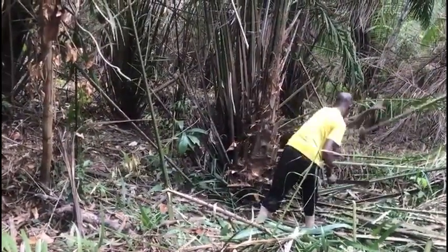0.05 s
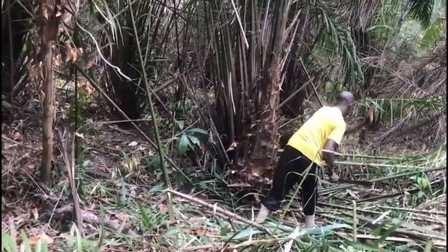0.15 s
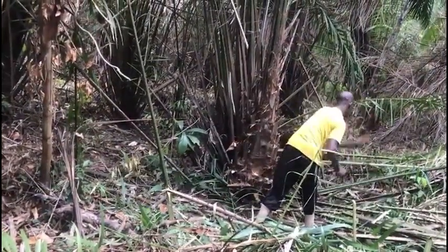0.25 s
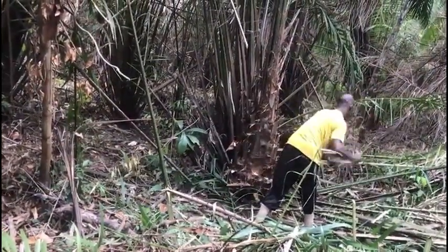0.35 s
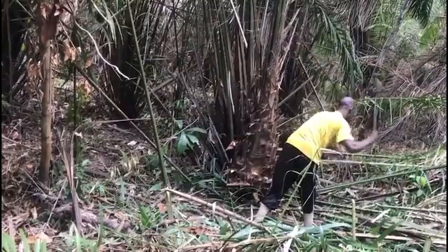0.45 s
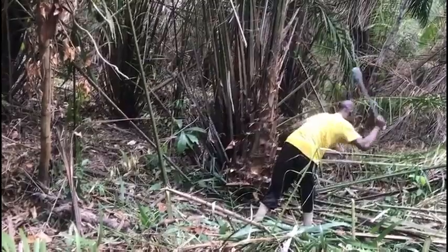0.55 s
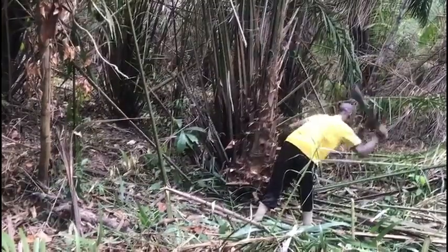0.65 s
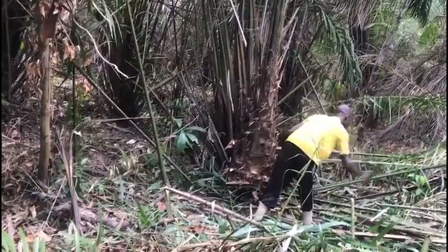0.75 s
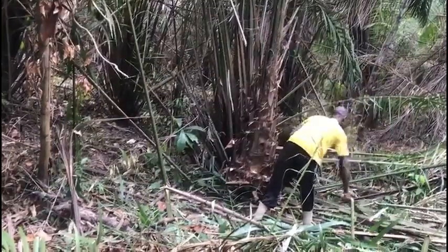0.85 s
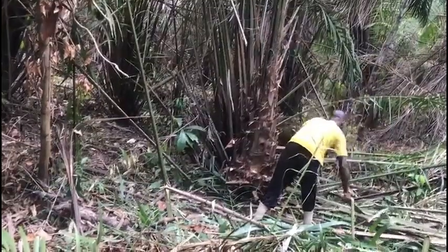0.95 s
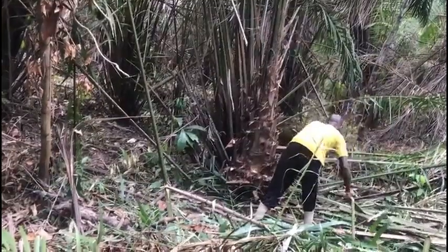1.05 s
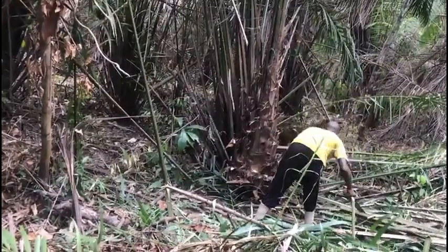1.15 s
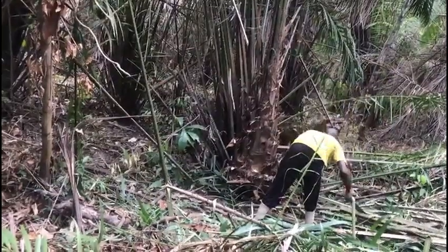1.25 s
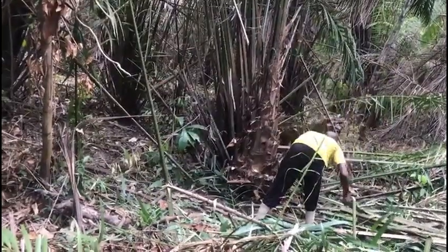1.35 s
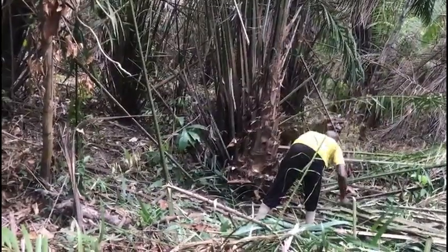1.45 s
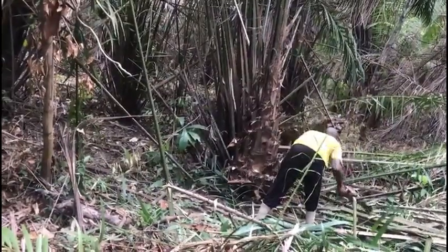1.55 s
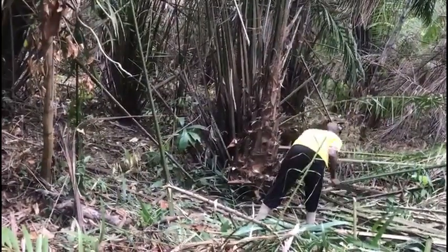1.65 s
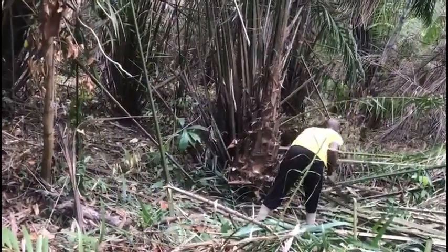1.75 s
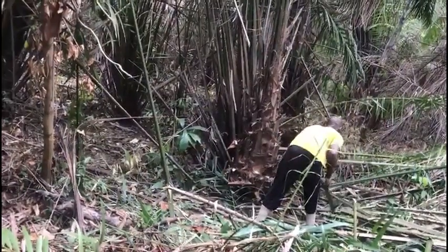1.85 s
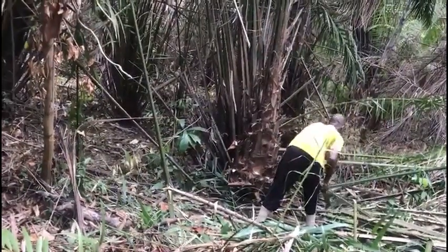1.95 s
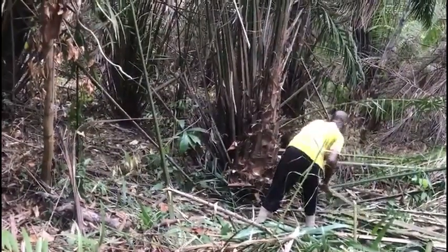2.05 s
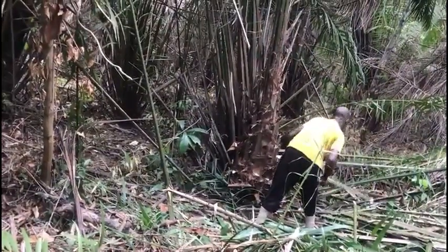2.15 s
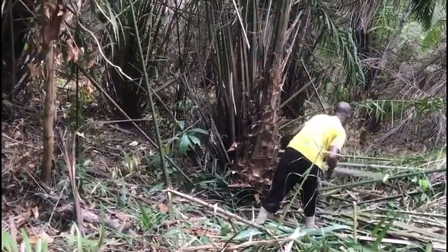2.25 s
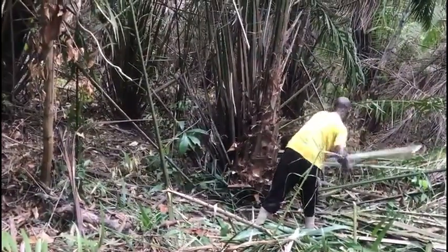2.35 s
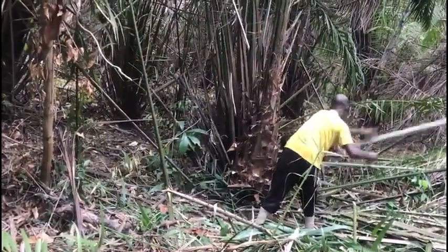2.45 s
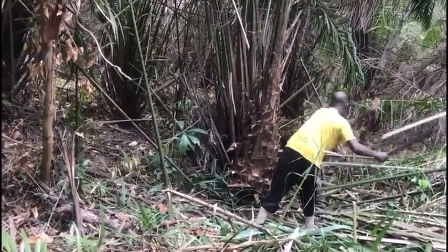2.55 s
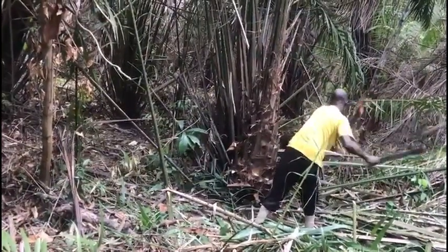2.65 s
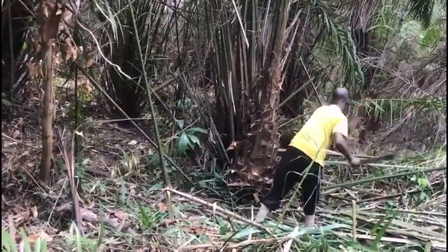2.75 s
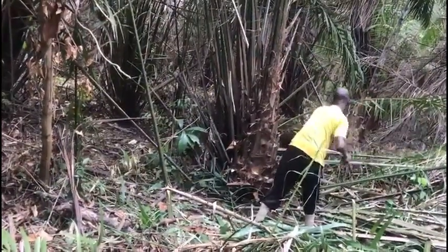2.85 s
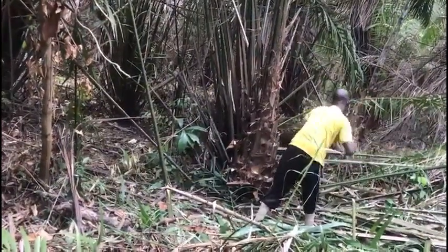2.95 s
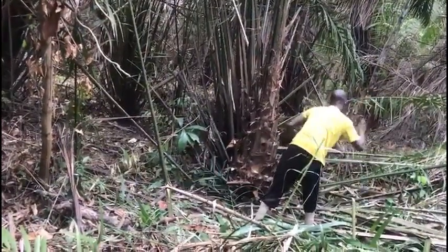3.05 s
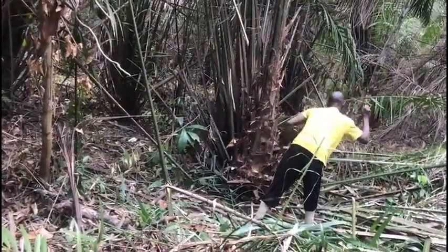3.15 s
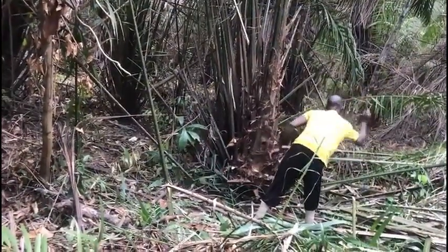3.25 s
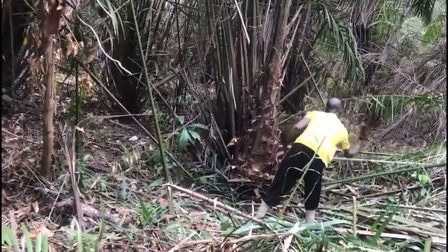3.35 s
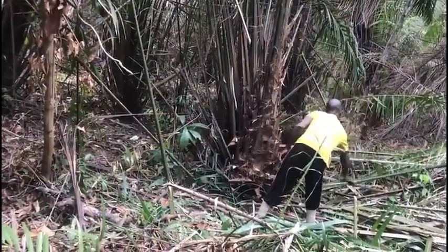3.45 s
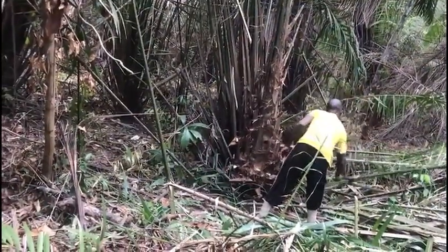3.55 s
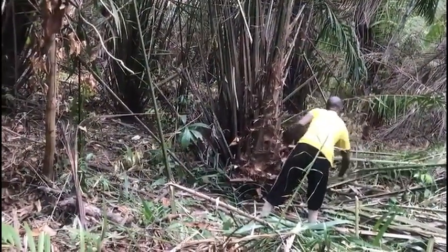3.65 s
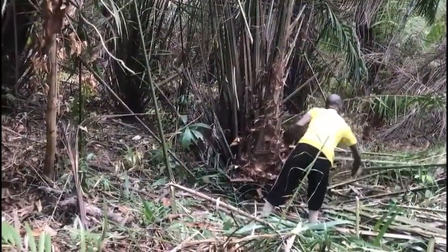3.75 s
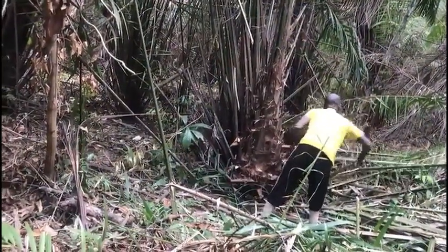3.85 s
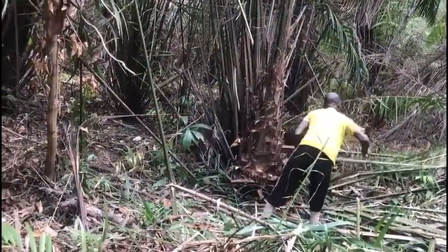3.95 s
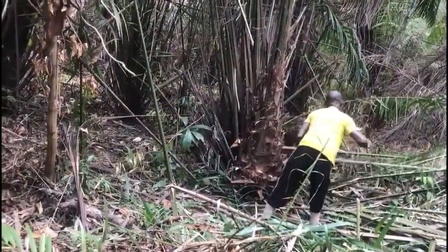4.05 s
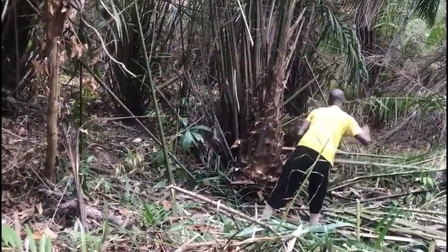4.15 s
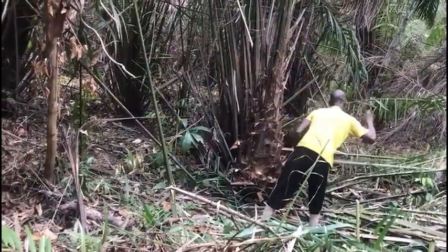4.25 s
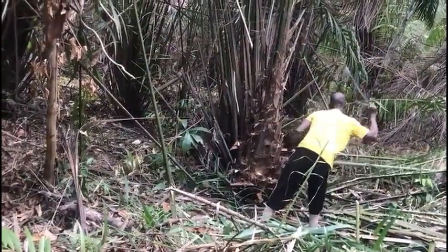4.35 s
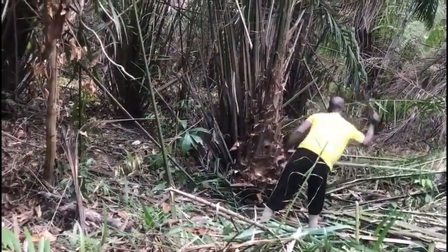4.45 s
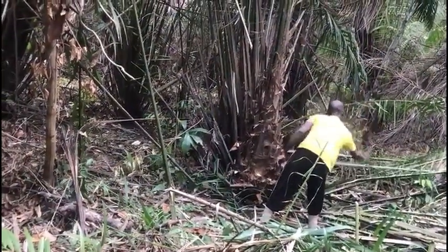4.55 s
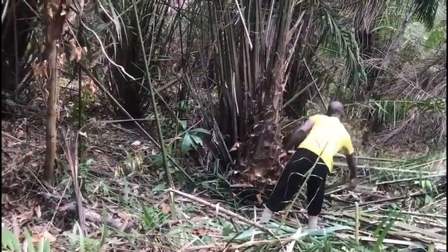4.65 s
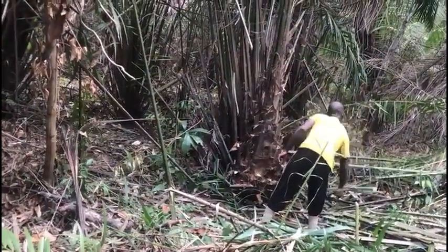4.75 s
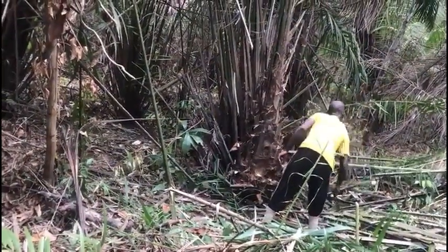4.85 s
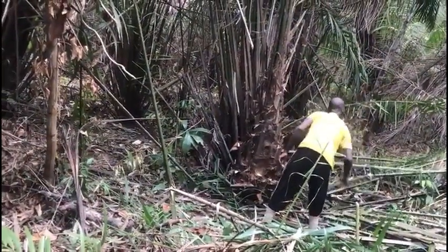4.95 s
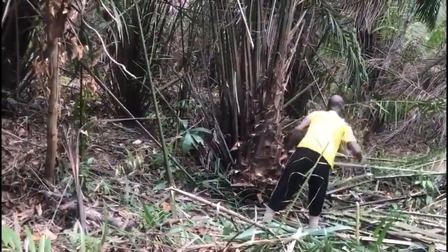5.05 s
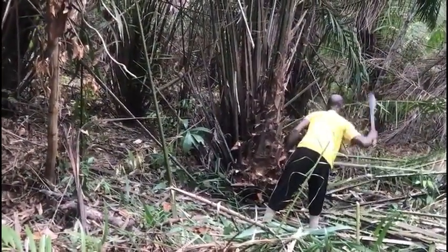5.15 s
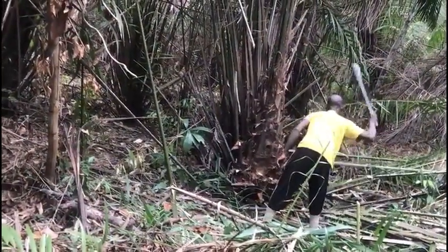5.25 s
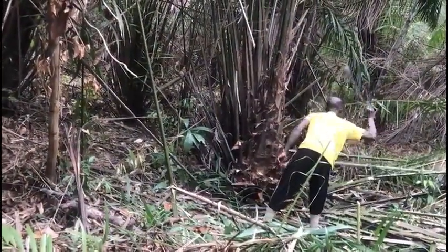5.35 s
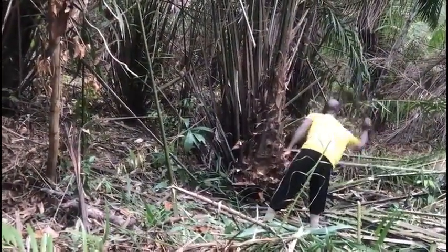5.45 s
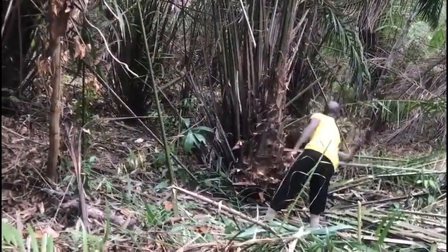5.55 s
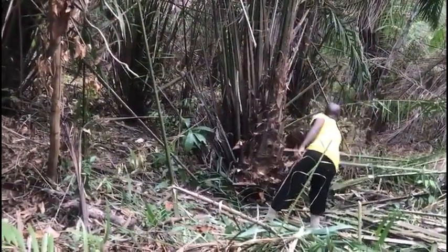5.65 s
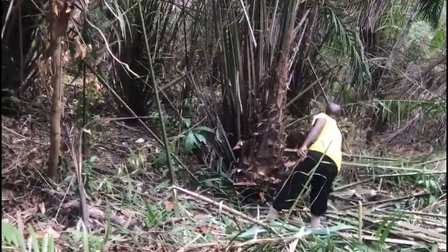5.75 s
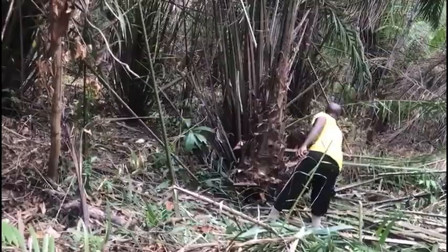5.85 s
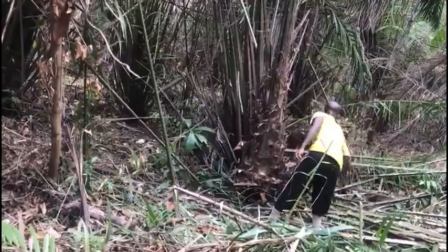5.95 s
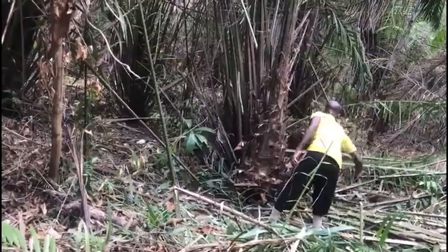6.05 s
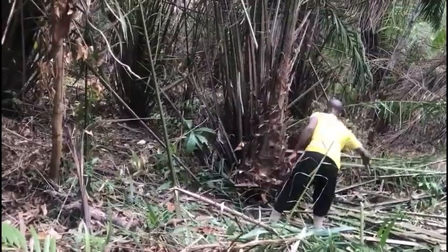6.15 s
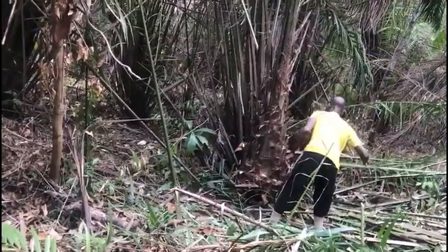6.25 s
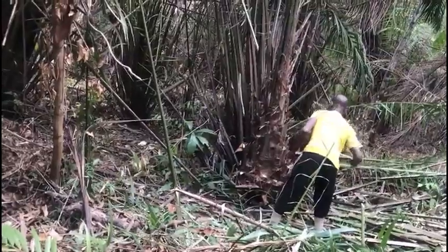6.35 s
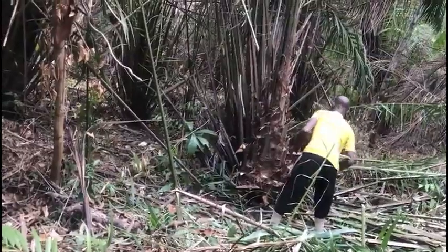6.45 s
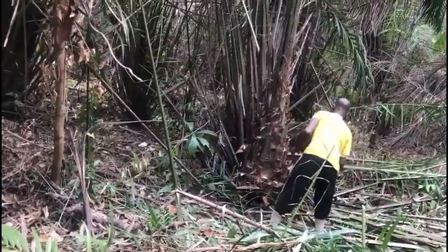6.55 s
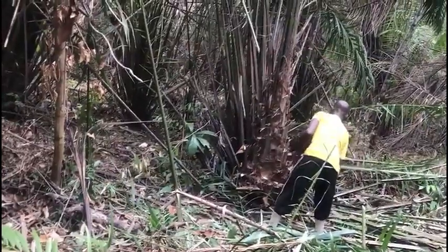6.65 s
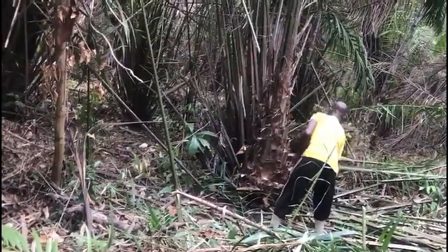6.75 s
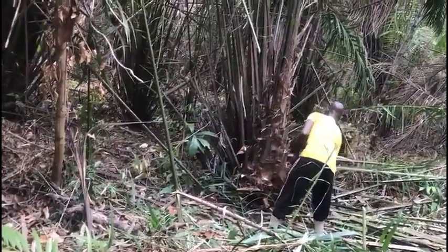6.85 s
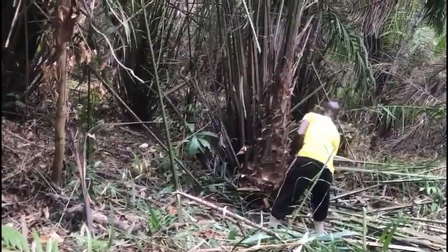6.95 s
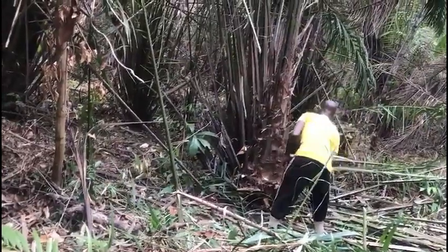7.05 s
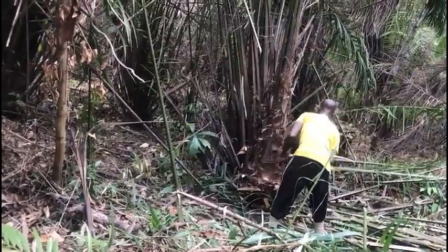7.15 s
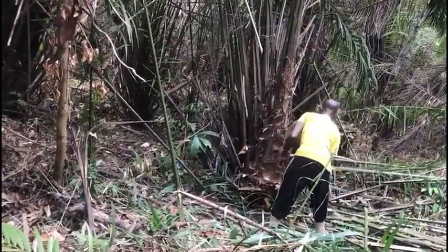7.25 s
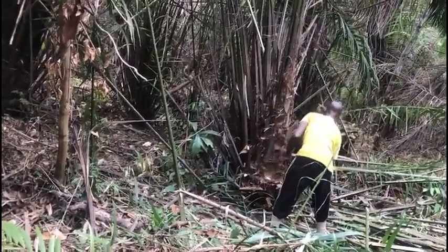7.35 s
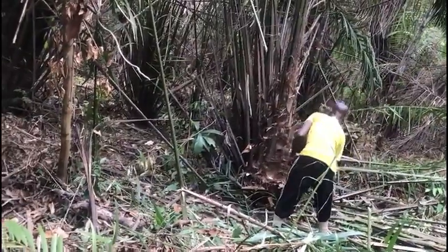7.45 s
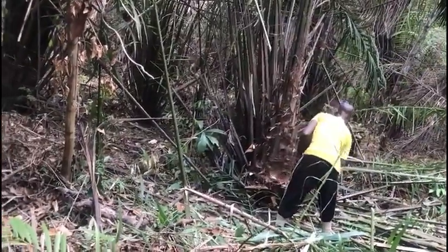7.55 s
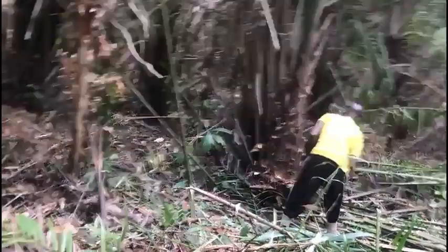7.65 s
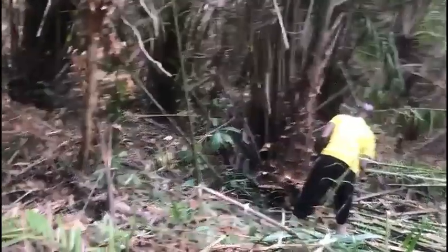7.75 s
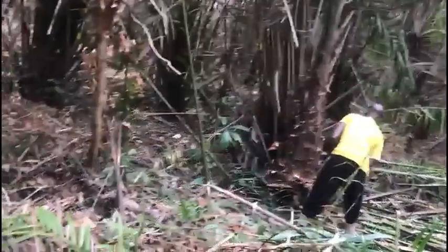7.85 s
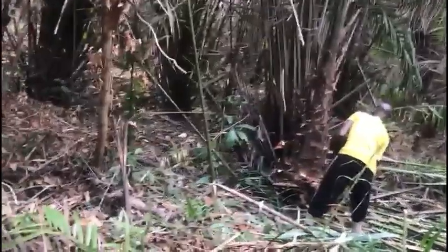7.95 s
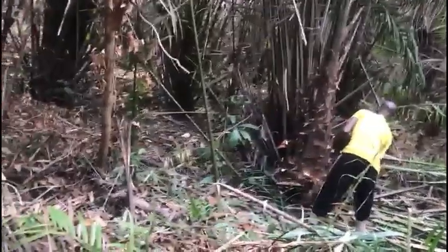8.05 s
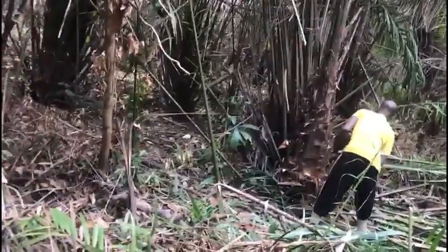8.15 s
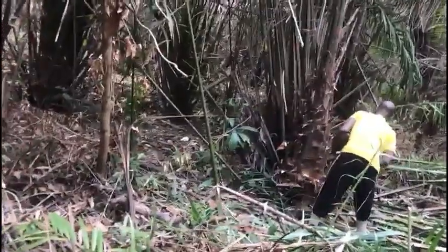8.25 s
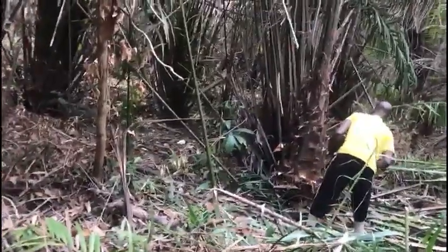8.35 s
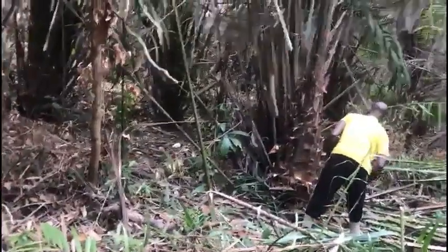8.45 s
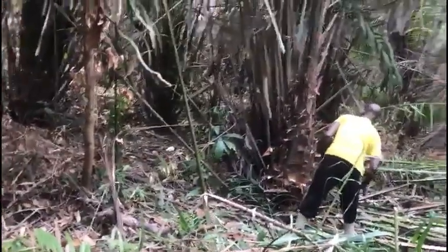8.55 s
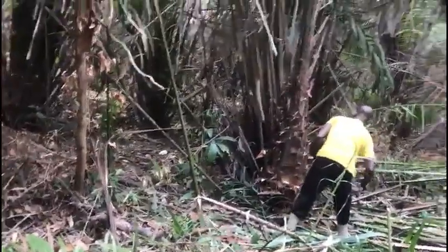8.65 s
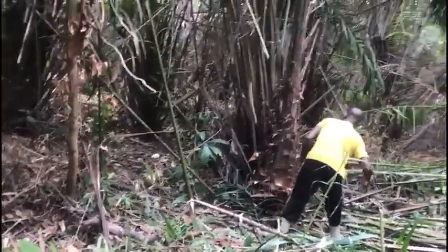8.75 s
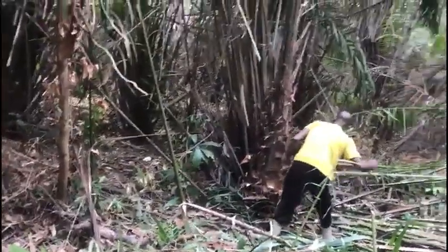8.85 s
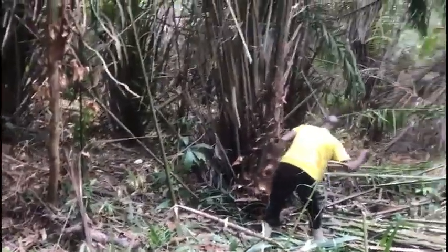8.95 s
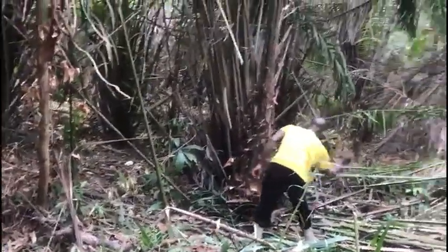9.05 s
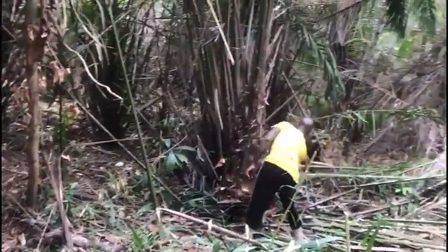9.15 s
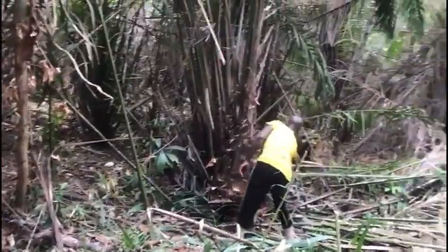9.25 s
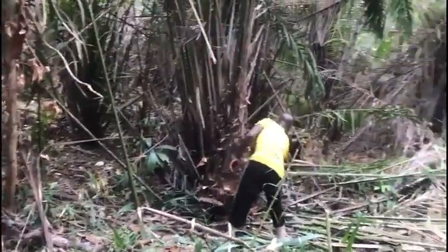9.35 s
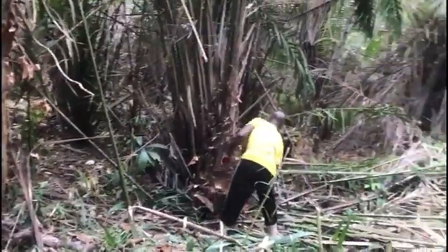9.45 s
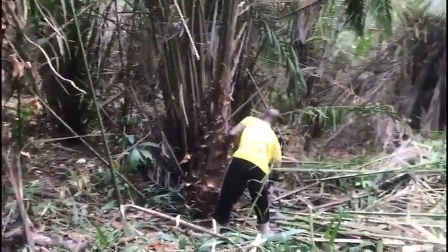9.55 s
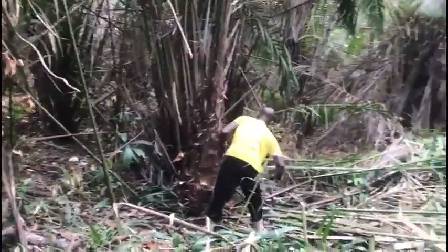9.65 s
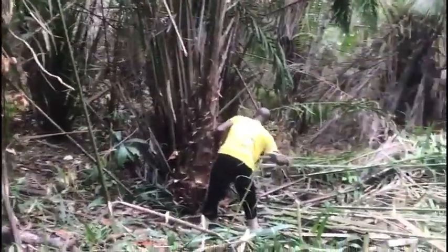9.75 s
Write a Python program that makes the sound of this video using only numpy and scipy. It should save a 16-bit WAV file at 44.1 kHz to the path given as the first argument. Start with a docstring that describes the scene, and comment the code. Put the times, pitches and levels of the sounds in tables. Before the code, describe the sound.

Outdoors, irregular blade chops split palm stalks, some loud and some dull, amid crackling twigs and rustling dry fronds over faint insect hiss.

```python
"""A faint coo over quiet hiss and rumble comes first, then a machete chops palm stems some metres away.
Fibres split in bright noise bursts with a ringing pitch; low thuds of tuned noise come from stems
knocking and dropping, and one soft low puff from wind or handling. Dry fronds rustle as fluttering hiss
and crackle as tiny damped tones when dragged or shaken by a blow. Insects and far birds call in throbbing
narrow bands, and trunks and leaves throw each blow back as a short tail of scattered noise."""
import sys
import numpy as np
from scipy import signal
from scipy.fft import rfft, irfft
from scipy.io import wavfile
from scipy.ndimage import uniform_filter1d

SR = 44100
rng = np.random.default_rng(int(sys.argv[2]) if len(sys.argv) > 2 else 0)


def to_wav(s):
    """Save 16-bit WAV."""
    ch = np.atleast_2d(s).T  # columns
    pcm = np.round(np.clip(ch, -1, 1) * 32767)  # PCM
    wavfile.write(sys.argv[1], SR, pcm.astype(np.int16))


N = 432613  # samples in the scene

# The blade bites, then the stem gives way a moment later: (bite time [s], bite level near its peak [dB],
# bite ring [Hz], tilt [dB per octave], delay until it gives way [s], level of that near its peak [dB],
# ring of that [Hz], level of the shivering leaves [dB])
CHOP_BLOWS = [(0.6705, -11, 2600, -5.4, 0.011, -14, 2710, -32), (0.89, 0.5, 9600, 0, .012, -5, 9670, -27.5),
              (3.5153, -4.5, 6560, -0.2, .008, -20, 4400, -31.5),
              (4.6957, -0.5, 7230, 2, 0.0037, -4.5, 7300, -32.5),
              (5.706, -7, 9100, 0.5, 0.011, -6, 3670, -28),
              (6.8878, -18, 2470, 0, 0.0048, -16.5, 2150, -36),
              (7.5407, -21.5, 1220, -1.5, 0.0049, -27, 1180, -47.5),
              (8.082, -19, 1807, -0.6, 0.0053, -33.5, 1770, -43),
              (9.31, -3, 6960, 2, 0.003, -12.5, 970, -29)]
# Twigs and leaf ribs snap: (time [s], level near the peak [dB], ring [Hz], ring strength [dB],
# tilt [dB per octave], shivering leaves relative to the snap level [dB])
TWIG_SNAPS = [(0.5253, -33, 6300, 11, 2, -18), (0.546, -31, 9200, 7, 8, -6),
              (0.6658, -22, 915, 7, -3, -23.5), (1.569, -23.5, 6370, 1.5, 4.5, -24.5),
              (1.621, -37.5, 7080, 9, 3, -20), (2.0186, -38.5, 4420, 2, -2, -18),
              (2.093, -30, 6550, 15, -4, -26), (2.4435, -45.5, 6000, 4, 0, -14),
              (2.597, -39, 5500, 8, 4, -35), (2.6496, -42, 5970, 10, 5, -35),
              (2.858, -39, 4000, 1, -3.5, -30), (3.084, -45, 3000, 4, -5.5, -30),
              (3.1215, -34, 9570, 9.5, .1, -12), (3.2182, -27, 2770, 13, -4.5, -17),
              (3.303, -22.5, 9680, 10.5, -3, -20.5), (3.3261, -26, 4060, 16, -4.5, -21),
              (3.577, -24, 4400, .1, -1.5, -20.5), (3.654, -29.5, 8500, 12, 2, -35),
              (3.6934, -39, 9000, 3, 8, -29), (3.706, -22, 9100, 5, 0, -46),
              (3.8384, -21, 972, 9, -5.5, -20), (3.97, -25.5, 4300, 26, 3, -33),
              (4.0975, -28.5, 9300, 14, 3, -27), (4.14, -40.5, 9630, 7, .1, -15),
              (4.1892, -18.5, 8800, 4, 4, -36), (4.6724, -39, 1970, 19, -8, -38),
              (4.745, -20.5, 930, -1, -7.5, -19), (4.8052, -26.5, 8790, -2, 2, -14.5),
              (4.856, -24, 4090, 3, 0.5, -36), (5.032, -34, 1200, 15, -4, -34),
              (5.158, -40, 1500, 9, -3.5, -30), (5.207, -33.5, 4380, 14, 2, -25),
              (5.249, -22.5, 5370, 6, -0.5, -29.5), (5.37, -37, 4500, 8, 1, -28),
              (5.63, -24.5, 4200, 1, 2.5, -44), (5.759, -18.5, 6090, 7, -3, -17.5),
              (5.817, -21, 1180, 11, -4, -20.5), (5.8622, -26.5, 993, 11, -10.5, -17),
              (5.921, -30.5, 9000, 6, 6, -15.5), (5.973, -25, 6300, 11, -0.5, -25),
              (6.423, -40, 1540, 5, -4.5, -22), (6.4605, -26.5, 4230, 8, -4.5, -35),
              (6.879, -41, 2100, 22, -7, -9), (7.4929, -31.5, 8650, 11, -3, -19),
              (8.0763, -29.5, 2320, 10, 4.5, -15), (9.081, -36.5, 3200, 7, -1, -35),
              (9.1026, -43, 8720, 6, .1, -27), (9.143, -39.5, 2790, 6, -4, -34),
              (9.2442, -41.5, 1070, 16, -2, -20), (9.2584, -40, 1310, 15, -8, -27),
              (9.4843, -40, 4060, 16, -4, -32), (9.738, -39, 8500, 8, 3, -30)]


def gain_of(db):
    """Turns decibels into a factor."""
    return 10 ** (np.asarray(db) / 20)


def evened(x):
    """Scales a sound to an average (rms) level of 1."""
    return x / np.sqrt(np.mean(x ** 2) + 1e-20)


def read(points, hz):
    """Reads a curve at the given frequencies, straight between points on a log-frequency axis."""
    f, value = np.transpose(points)
    return np.interp(np.log(hz + 1), np.log(f + 1), value)


def add(mix, s, sound):
    """Adds a sound to the mix, starting at s seconds."""
    part = mix[round(s * SR):][:len(sound)]
    part += sound[:len(part)]


def octaves(hz):
    """Counts octaves from 4 kHz, where every tilt is zero; below 700 Hz the count stays level."""
    return np.log2(np.maximum(hz, 700) / 4000)


def coloured(x, spectrum, size, tilt=0, patchy_db=0):
    """Shapes noise to a spectrum of average power 1, with random patches that drift in time and pitch."""
    overlap = size - size // 4
    hz, t, z = signal.stft(x, SR, nperseg=size, noverlap=overlap)
    shape = gain_of(read(spectrum, hz) + tilt * octaves(hz))
    shape /= np.sqrt(np.mean(shape ** 2))
    patches = rng.standard_normal(z.T.shape)  # frames by frequencies
    patches = uniform_filter1d(patches, size=10, axis=0)
    patches = evened(uniform_filter1d(patches, size=8, axis=1))
    z = z * shape[:, None] * gain_of(patchy_db * patches.T)
    return signal.istft(z, SR, nperseg=size, noverlap=overlap)[1][:N]


def air(power):
    """Steady faint hiss of the grove over a wavering low rumble that swells when the fronds move."""
    # Hiss of still air: (frequency [Hz], relative level per Hz [dB])
    hiss_spectrum = [(180, -23), (300, -1.5), (455, -9.5), (523, -25), (781, -4.5), (1110, -6),
                     (1540, -7.5), (5990, -21.5), (8680, -13), (12000, -37), (15600, -62), (22000, -120)]
    # Low rumble: (frequency [Hz], relative level per Hz [dB])
    rumble_spectrum = [(12, -52), (20, -35.5), (49, -3.5), (103, -5), (219, -4.5), (333, -7.5), (455, -12),
                       (700, -13.5), (910, -45.5), (1540, -120)]
    hiss_db, still_rumble_db = -69.5, -70
    hiss = gain_of(hiss_db) * coloured(rng.standard_normal(N), hiss_spectrum, size=1024, patchy_db=0.6)
    rumble = coloured(rng.standard_normal(N), rumble_spectrum, size=2048, patchy_db=3.5)

    # The swell follows the frond level, averaged over a short stretch of time
    stirred_below_fronds_db, stir_s = -16.5, 0.15
    frond_db = uniform_filter1d(10 * np.log10(power), round(stir_s * SR))
    rumble_gain = np.hypot(gain_of(still_rumble_db), gain_of(frond_db + stirred_below_fronds_db))
    return hiss + rumble_gain * rumble


def call(start, end, db, hz, width, throbs, depth, fade, clear):
    """One insect or bird call: a narrow band, part tone and part noise, whose strength throbs."""
    t = np.arange(max(start - fade / 2, 0), end + fade / 2, 1 / SR)
    turn = np.exp(2j * np.pi * hz * t)
    # Smooth the noise around zero pitch with two equal poles, then shift it up to the call's pitch
    pole = np.exp(-np.pi * width / SR)
    noise = rng.standard_normal(len(t)) / turn
    band = (turn * signal.lfilter([1], np.convolve([1, -pole], [1, -pole]), noise)).real
    voice = (1 - clear) * evened(band) + clear * evened(turn.real)
    throb = 1 + depth * np.sin(2 * np.pi * throbs * t)
    edges = np.clip(np.minimum(t - t[0], t[-1] - t) / fade, 0, 1)
    return t[0], gain_of(db) * edges * evened(voice * throb)


def animal_calls():
    """Insects and far birds, each call with the pitch and throb of its kind."""
    # When each kind calls, by name: (start [s], end [s], level [dB])
    spells_by_kind = {"high insect": [(1.2, 2.4, -74.5), (2.1, 3.1, -76), (7.6, 8.4, -76), (8.4, 9.3, -74)],
                      "low insect": [(6.25, 6.9, -76), (7.9, 8.65, -75)], "chirp": [(2.1, 2.16, -73),
                      (2.44, 2.6, -71)], "trill": [(2.26, 2.36, -74)], "coo": [(.0, .1, -64),
                      (2.51, 2.61, -62.5)]}
    # How each kind sounds, by name: (pitch [Hz], band width [Hz], throbs [per s], throb depth [0-1],
    # fade [s], share of clear tone [0-1])
    songs = {"high insect": (8000, 130, 45, .6, .08, .2), "low insect": (6400, 70, 40, .4, .08, .6),
             "chirp": (4620, 40, 40, .4, .03, .8), "trill": (4870, 60, 26, .9, .02, .8),
             "coo": (355, 45, 20, .3, .03, .4)}
    out = np.zeros(N)
    for kind, spells in spells_by_kind.items():
        for spell in spells:
            add(out, *call(*spell, *songs[kind]))
    return out


def shaking():
    """Power of the moving fronds: dragged by hand, and set shivering by each chop and snap."""
    # Fronds dragged and shaken: (time [s], level [dB])
    drag_levels = [(0.52, -68.5), (0.7, -47), (1.15, -59), (2.37, -66.5), (2.68, -58.5), (3.08, -65.5),
                   (3.3, -43), (3.44, -52), (3.77, -47.5), (4.32, -63), (4.7, -56), (4.86, -43.5),
                   (5.1, -56.5), (5.55, -50), (5.7, -53), (6.15, -52.5), (6.4, -65), (9.3, -65.5),
                   (9.5, -54.5), (9.81, -54.5)]
    drag_s, drag_db = np.transpose(drag_levels)
    power = gain_of(np.interp(np.arange(N) / SR, drag_s, drag_db)) ** 2

    t, shiver_t60, rise_s = np.arange(SR) / SR, 0.36, 0.0021  # t60: seconds to fall by 60 dB
    dying = gain_of(-60 * t / shiver_t60) ** 2 * np.minimum(t / rise_s, 1)
    shivers = [(c[0], c[-1]) for c in CHOP_BLOWS]
    shivers += [(c[0], c[1] + c[-1]) for c in TWIG_SNAPS]
    for s, db in shivers:
        add(power, s + 0.001, gain_of(db) ** 2 * dying)
    return power


def crackles(count=24):
    """Dry leaflets snap at random: quickly damped tones, each kind at its own pitch."""
    snaps_per_s = 110
    size = gain_of(7.4 * np.minimum(rng.exponential(1, N), 3)) * (rng.random(N) < snaps_per_s / SR)
    kind = rng.integers(0, count, N)
    t, out = np.arange(600) / SR, np.zeros(N)
    for k, hz in enumerate(np.geomspace(2000, 9000, count)):
        life = rng.uniform(.25, .8) / hz  # a fraction of one cycle, in seconds
        snap = np.sin(2 * np.pi * hz * t) * t / life * np.exp(-t / life)
        out += signal.oaconvolve(size * (kind == k), snap)[:N]
    return evened(out)


def fronds(power):
    """Leaves rub in a dense hiss that flutters at random, with scattered crackles."""
    # Hiss of rubbing leaves: (frequency [Hz], relative level per Hz [dB])
    leaf_spectrum = [(180, -33), (300, -11.5), (785, -10.5), (934, -1), (1550, -3), (4380, -1.5),
                     (9480, -3.5), (11800, -9), (13000, -37)]
    flutters_per_s, flutter_t60, crackle_db = 120, .012, -15.5  # crackles relative to the hiss
    size = gain_of(7.1 * np.minimum(rng.exponential(1, N), 4)) * (rng.random(N) < flutters_per_s / SR)
    flutter = signal.oaconvolve(size, gain_of(-60 * np.arange(1000) / SR / flutter_t60))[:N]
    rubbing = evened((1 + .15 * flutter) * rng.standard_normal(N))
    hiss = coloured(rubbing, leaf_spectrum, size=256, tilt=-.2, patchy_db=1.5)
    return np.sqrt(power) * (hiss + gain_of(crackle_db) * crackles())


def grove(x):
    """Trunks and leaves scatter the sound back; three noise tails take turns so that blows differ."""
    # How long echoes last: (frequency [Hz], time to fall by 60 dB [s])
    echo_times = [(150, .3), (700, 0.18), (2000, 0.35), (5000, 0.54), (11000, 0.34)]
    rise_s, turns_per_s = 0.0036, 1.7
    taps = rng.standard_normal((3, SR)) * np.minimum(np.arange(SR) / SR / rise_s, 1)
    hz, t, z = signal.stft(taps, SR, nperseg=256)
    fading = gain_of(-60 * t / read(echo_times, hz)[:, None])
    tails = signal.istft(z * fading, SR, nperseg=256)[1]
    tails /= np.linalg.norm(tails[0])
    # Three evenly spaced phases keep the total power steady
    phase = np.arange(N) / SR * turns_per_s + np.arange(3)[:, None] / 3
    turn = np.cos(2 * np.pi * phase) * np.sqrt(2 / 3)
    return signal.fftconvolve(x * turn, tails, axes=1).sum(0)[:N]


def thud(db, pitch_hz, noise):
    """A dull push, loosely tuned around one low pitch; little spreads below it, and high ones die sooner."""
    t, hz = np.arange(len(noise)) / SR, np.fft.rfftfreq(len(noise), 1 / SR) + 1
    off = hz / pitch_hz - pitch_hz / hz  # distance from the pitch
    steepness = np.where(off > 0, .6, 1.2)
    body = evened(irfft(rfft(noise) / (1 + (1.5 * off) ** 2) ** steepness))
    rise_cycles = 2.1
    rise = np.minimum(t * pitch_hz / rise_cycles, 1)
    t60 = 0.12 * (200 / pitch_hz) ** .45  # 0.12 s for a thud at 200 Hz
    return gain_of(db - 3) * body * rise * gain_of(-60 * t / t60)


def crack(db, ring_hz, ring_db, tilt, hold, noise):
    """A first snap, then fibres tear in uneven spikes for the hold time and fade; one pitch rings out."""
    # Sound of splitting fibres: (frequency [Hz], relative level per Hz [dB])
    split_spectrum = [(120, -42), (200, -10), (560, -12), (2230, -5), (2520, -5), (3700, -3), (7830, -4),
                      (9830, -4), (11700, -6), (13000, -36)]
    t, hz = np.arange(len(noise)) / SR, np.fft.rfftfreq(len(noise), 1 / SR)
    ring = ring_db * np.exp(-(np.log2((hz + 1) / ring_hz) / .2) ** 2)
    colour = gain_of(read(split_spectrum, hz) + tilt * octaves(hz) + ring)
    spiky = noise * abs(noise) ** 0.61
    tearing = evened(irfft(rfft(spiky) * colour))

    u = t / 0.00082  # time in units of the first snap's rise
    first_snap = 0.78 * u * np.exp(1 - u)
    fade_t60 = 0.033 + 1.7 * hold  # long splits also fade longer
    fading = gain_of(-60 * np.maximum(t - hold, 0) / fade_t60)
    return gain_of(db - 11) * tearing * (first_snap + .5 * np.minimum(u, 1) * fading)


def blows():
    """Places every thud, snap and chop at its moment; a chop is a bite and then the stem giving way."""
    # Low thuds, from stems knocking and dropping, and one soft low puff of wind or handling:
    # (time [s], level near the peak [dB], pitch [Hz])
    low_thuds = [(0.551, -33, 248), (0.675, -28.5, 377), (0.906, -27, 171), (0.945, -45.5, 205),
                 (2.096, -46.5, 172), (2.1, -42.5, 800), (3.122, -41, 333), (3.225, -37.5, 222),
                 (3.24, -52, 48), (3.528, -31.5, 275), (3.844, -40, 238), (4.704, -31, 308),
                 (4.746, -34.5, 188), (5.713, -31, 245), (5.729, -37, 164), (5.92, -41, 160),
                 (6.894, -44.5, 700), (7.538, -34.5, 150), (8.085, -33.5, 662), (9.313, -14, 360),
                 (9.312, -15.5, 1040), (9.338, -28.5, 174), (9.453, -40, 167)]
    out = np.zeros(N)
    for s, db, hz in low_thuds:
        add(out, s, thud(db, hz, rng.standard_normal(16384)))
    for s, db, hz, ring_db, tilt, _ in TWIG_SNAPS:
        add(out, s, crack(db, hz, ring_db, tilt, hold=0.0047, noise=rng.standard_normal(8192)))
    for s, db, hz, tilt, later, give_db, give_hz, _ in CHOP_BLOWS:
        bite = crack(db, hz, 7, tilt, hold=0.005, noise=rng.standard_normal(8192))
        # The stem gives way with a duller tilt
        give = crack(give_db, give_hz, 4.5, tilt - 1.8, hold=0.0049, noise=rng.standard_normal(8192))
        add(out, s, bite)
        add(out, s + later, give)
    return out


def scene():
    """Adds up air, calls, fronds, and the blows with their echo."""
    power, hits = shaking(), blows()
    echo = gain_of(-12.5) * grove(hits)
    return (air(power) + animal_calls() + fronds(power) + echo + hits)[None]


def record(dry):
    """The input rounds off the highest peaks; the treble ends steeply at the band limit."""
    ceiling, edge_hz = .85, 12150
    rounded = ceiling * np.tanh(dry / ceiling)
    low_pass = signal.firwin(255, edge_hz, window=("kaiser", 9), fs=SR)
    return signal.oaconvolve(rounded, low_pass[None], "same")


dry = scene()
out = record(dry)
to_wav(out)
```